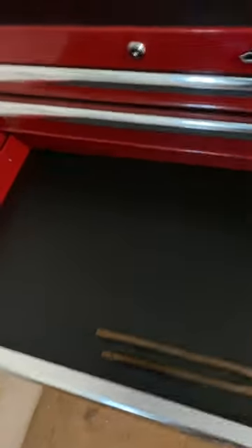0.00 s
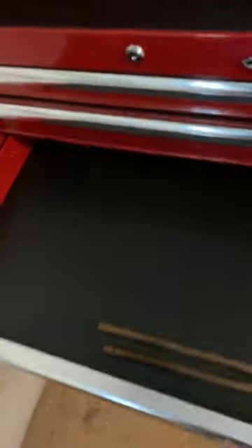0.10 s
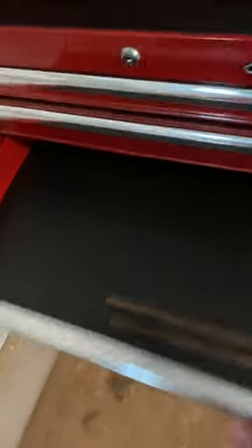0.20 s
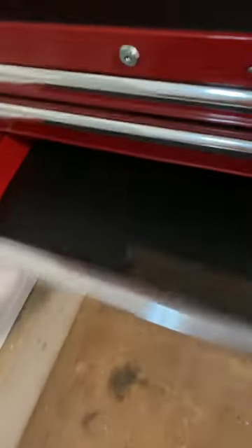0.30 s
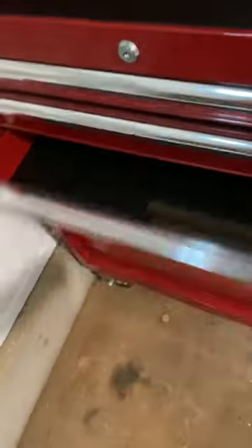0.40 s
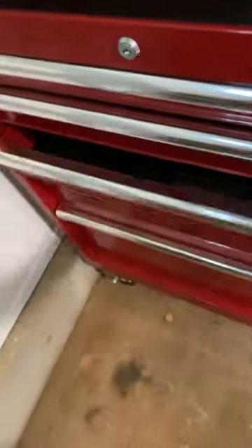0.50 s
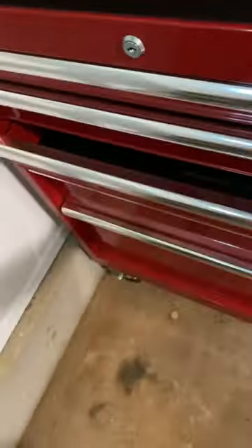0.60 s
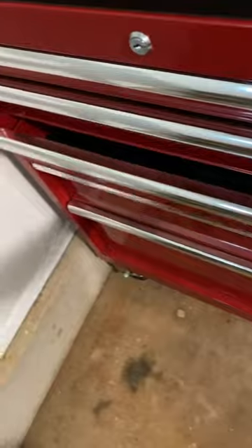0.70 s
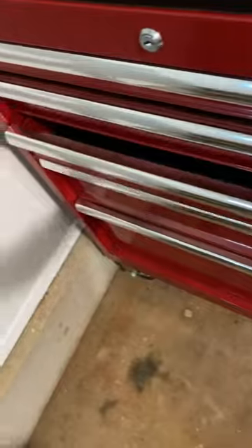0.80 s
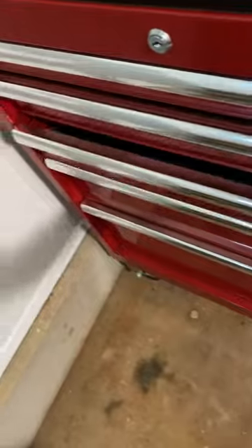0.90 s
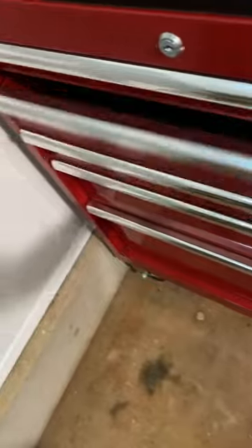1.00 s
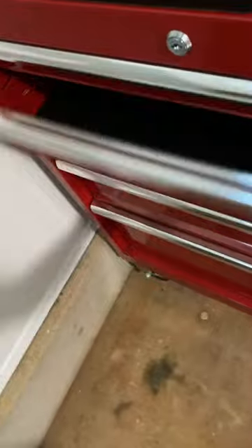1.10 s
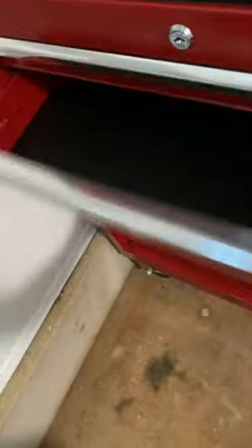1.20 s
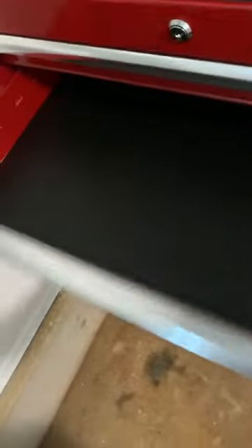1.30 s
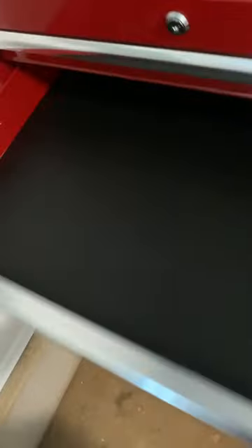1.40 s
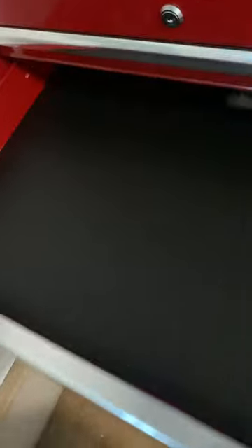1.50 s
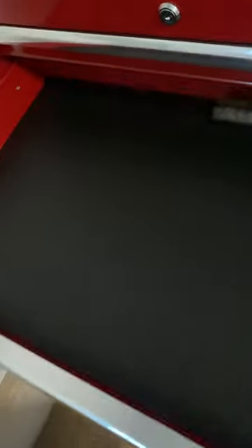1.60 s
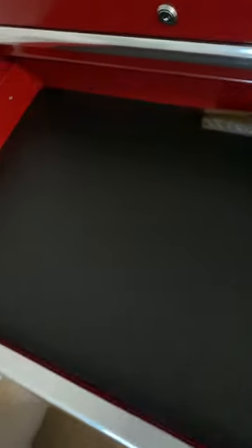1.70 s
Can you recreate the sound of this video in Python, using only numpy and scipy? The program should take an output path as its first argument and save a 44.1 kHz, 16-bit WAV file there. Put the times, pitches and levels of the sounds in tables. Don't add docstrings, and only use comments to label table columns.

```python
import sys
import numpy as np
from scipy import signal
from scipy.fft import rfft, irfft
from scipy.io import wavfile
from scipy.ndimage import uniform_filter1d

SR = 44100
rng = np.random.default_rng(int(sys.argv[2]) if len(sys.argv) > 2 else 0)


def decibels_to_gain(level_db):
    exponent = np.asarray(level_db, float) / 20
    return 10 ** exponent


def log_audio(samples):
    frames = np.atleast_2d(samples).T
    limited = np.clip(frames, -1, 1)
    pcm = np.round(limited * 32767).astype(np.int16)
    wavfile.write(sys.argv[1], SR, pcm)


N = 77175


def rms_one(x):
    return x / np.sqrt(np.mean(x ** 2) + 1e-20)


def colour(x, points):
    hz, db = np.transpose(points)
    bins_hz = np.arange(N // 2 + 1) * SR / N
    gain_db = np.interp(np.log(bins_hz + 1), np.log(hz), db, -90, -90)
    return irfft(rfft(x) * decibels_to_gain(gain_db), N)


def band(x, low_hz, high_hz):
    return signal.sosfilt(signal.butter(2, [low_hz, high_hz], "band", fs=SR, output="sos"), x)


def grains(per_s, spread_db):
    size = decibels_to_gain(spread_db * np.minimum(rng.exponential(1, N), 4))
    size = size * rng.choice([-1, 1], N)
    return rms_one(size * (rng.random(N) < per_s / SR))


def ring(x, hz, t60):
    r = decibels_to_gain(-60 / (max(t60, 0.01) * SR))
    w = 2 * np.pi * hz / SR
    return signal.lfilter([0, np.sin(w)], [1, -2 * r * np.cos(w), r * r], x + 1e-18)


def body(modes, drive_db, per_s):
    bumps = [grains(per_s, 3.5) for _ in modes]
    steady, driven = 0, 0
    for bump, (hz, db, t60) in zip(bumps, modes):
        free = ring(bump, hz, t60)
        steady = steady + decibels_to_gain(db) * rms_one(free)
        driven = driven + decibels_to_gain(db) * ring(bump * decibels_to_gain(drive_db), hz, t60) / np.std(free)
    return driven / np.sqrt(np.mean(steady ** 2))


def cabinet(sway_db):
    # frequency in Hz, level in dB, t60 in seconds.
    carcass_modes = [(74, -7.5, 0.099), (88.7, -5.5, 0.13), (104, -4.5, 0.066), (125.6, 1, 0.098),
                     (153.3, -6, 0.078)]
    boom = body(carcass_modes, 0 * sway_db, 800)
    power = uniform_filter1d(boom ** 2, size=int(0.045 * SR))
    return decibels_to_gain(sway_db) * boom / np.sqrt(power + 0.025)


def rolling():
    # time in seconds, then in dB rolling load, cabinet sway, ball chatter
    motion = [(0.0, -52.5, -43.5, -57, 0), (0.08, -41.5, -47.5, -53.5, -11), (0.174, -40, -51.5, -53.5, -2),
              (0.3, -35.5, -39, -52.5, 0), (0.428, -33, -30.5, -50, -8.5), (0.476, -33.5, -29, -51, 2),
              (0.6, -40, -31, -45.5, 1.5), (0.72, -42, -40.5, -49.5, 0), (0.8, -42, -38.5, -54, -5),
              (0.889, -44, -44, -53.5, -1.5), (0.93, -34, -32.5, -55, -2), (1.0, -39.5, -31.5, -46, 4.5),
              (1.12, -37, -39.5, -48, 1), (1.282, -39.5, -40, -55, 5), (1.428, -38.5, -31, -53.5, 8),
              (1.56, -43.5, -40.5, -59, 6), (1.75, -48, -55, -61.5, 0)]
    # frequency in Hz, level in dB, t60 in seconds.
    panels = [(209, -6.5, 0.06), (281.3, -12, 0.49), (325.9, -1.5, 0.12), (367, -1, 0.11),
              (427, -7.5, 0.24), (518, -0.5, 0.12), (612, 3.5, 0.18), (657.5, 4.5, 0.16),
              (784.4, -5.5, 0.34), (950, -7, 0.072), (1134, -5.5, 0.032), (1246, -12, 0.041),
              (1382, -2, 0.043), (1720, -12, 0.036)]
    # frequency in Hz, density in dB per Hz.
    rumble = [(150, -56), (250, -8.5), (500, -5), (900, -3), (1300, -6.5), (1800, -21), (2500, -23),
              (4000, -34)]
    # frequency in Hz, density in dB per Hz.
    deep_rumble = [(120, -18), (170, -8), (250, -3), (350, -14), (450, -9), (600, -23)]
    # frequency in Hz, density in dB per Hz.
    chatter_spectrum = [(1500, 3), (2500, -0.5), (5000, -1.5), (7200, 0), (8400, -4), (9500, -13.5),
                        (15500, -41)]
    bumps_per_s, deep_below_hz = 900, 500

    s, *columns = np.transpose(motion)
    load, sway, chatter, weight = [np.interp(np.arange(N) / SR, s, c) for c in columns]
    rails = decibels_to_gain(load - 3) * rms_one(colour(grains(3500, 3.0), rumble))
    rails += decibels_to_gain(load + weight - 15.0) * rms_one(colour(grains(1500, 4.6), deep_rumble))
    balls = decibels_to_gain(chatter) * rms_one(colour(grains(8300, -0.5), chatter_spectrum))
    deep_modes = [m for m in panels if m[0] < deep_below_hz]
    high_modes = [m for m in panels if m[0] >= deep_below_hz]
    deep = body(deep_modes, load + weight - 3.0, bumps_per_s)
    high = body(high_modes, load - 2.5, bumps_per_s)
    return deep + high + cabinet(sway - 3.0) + rails + balls


def microphone_hiss():
    return decibels_to_gain(-77.5) * rms_one(band(rng.standard_normal(N), 10000, 20000))


def knocks():
    # start in seconds, peak in dB, pitch in Hz, t60 in seconds.
    blows = [(0.031, -45, 700, 0.64), (0.068, -51, 632, 0.19), (0.292, -37.5, 5800, 0.046),
             (0.36, -36, 2590, 0.02), (.49, -26, 640, 0.1), (0.463, -16, 1183, 0.061),
             (.482, -23, 333, 0.16), (0.462, -18.5, 66, 0.32), (0.468, -20.5, 124.3, 0.41),
             (.46, -21.5, 335, 0.11), (.51, -25, 269, 0.096), (.53, -27.5, 340, .1), (.49, -28, 530, 0.13),
             (0.52, -21, 147, 0.16), (0.72, -30, 121, 0.14), (.464, -25, 1500, 0.055),
             (.910, -26.5, 5060, 0.037), (0.915, -26, 1380, 0.085), (.99, -30, 600, .1),
             (1.062, -26.5, 590, 0.15), (1.1, -30, 530, .1), (.983, -29.5, 1810, 0.073),
             (1.055, -24, 88, 0.3), (1.145, -30.5, 126.3, 0.32), (1.125, -21.5, 78, 0.3),
             (1.175, -29.5, 365, .15), (1.38, -20.5, 397, 0.074), (1.260, -34, 595.7, 0.51),
             (1.373, -26, 606.6, 0.16), (1.372, -23.5, 248, 0.069), (1.425, -26, 400, 0.071),
             (1.638, -43, 4600, .015), (1.640, -43, 2460, 0.027), (0.0012, -39.5, 223, .3),
             (.775, -33.5, 332, 0.16), (1.372, -23, 488, 0.034), (1.41, -31, 196, 0.091),
             (1.55, -29, 370, 0.09)]
    rise_cycles, detune = 1.87, 0.0548
    out = np.zeros(N)
    for s, db, hz, t60 in blows:
        i = int(s * SR)
        t = np.arange(N - i) / SR
        turn = 2 * np.pi * hz * t
        group = np.sin(turn)
        group += 0.34 * np.sin(turn * (1 + detune))
        group += 0.41 * np.sin(turn * (1 - 1.75 * detune))
        out[i:] += decibels_to_gain(db - 0.5 - 60 * t / t60) * (1 - np.exp(-t * hz / rise_cycles)) * group
    return out


def garage(x):
    t = np.arange(SR // 2) / SR
    t60 = 0.4
    tail = rng.standard_normal(len(t)) * decibels_to_gain(-60 * t / t60) * (1 - np.exp(-t / 0.0016))
    walls = signal.butter(1, [180.0, 2100], "band", fs=SR, output="sos")
    tail = signal.sosfilt(walls, tail)
    tail = 3.9 * tail / np.sqrt(np.sum(tail ** 2))
    return decibels_to_gain(-22) * signal.fftconvolve(x, tail)[:N]


def swells(events):
    out = np.zeros(N)
    for s, db, hz, length, glide in events:
        t = np.arange(N) / SR - s
        shape = np.sin(np.pi * np.clip(t / length, 0, 1)) ** 1.46 * (t < length)
        out += decibels_to_gain(db) * shape * np.sin(2 * np.pi * (hz + glide * t / 2) * t)
    return out


def stick_slip():
    # start in seconds, peak in dB, pitch in Hz, length in seconds, glide in Hz per second.
    slips = [(0.198, -25.5, 600.3, 0.034, 500), (0.234, -23, 620, 0.016, -600),
             (0.247, -28, 606, 0.015, -500), (0.378, -27.5, 653, .015, -500),
             (0.462, -11, 629, 0.016, -300), (0.925, -24, 475.5, 0.046, -1000),
             (1.029, -33, 444, 0.035, 200), (1.062, -30, 438.5, 0.037, 0.1), (1.3705, -19, 350, 0.01, 500),
             (1.412, -22.5, 331, 0.011, 500), (1.446, -26.5, 330, 0.011, 500)]
    return swells(slips)


def clacks():
    # start in seconds, level in dB, length in seconds, dull part in dB,
    # bright part in dB.
    contacts = [(0.289, -33.5, .005, -4.5, -11), (.296, -37.5, 0.0074, -6, -14),
                (0.347, -36, 0.0096, -14, -18), (0.394, -38.5, 0.006, 6, -6), (.401, -43.5, 0.0094, 1, -12),
                (0.445, -39.5, 0.025, -3, -3), (0.4534, -19.5, 0.0042, -9.5, -14),
                (0.457, -15.5, 0.0083, -15, -22), (0.4619, -10.5, 0.0036, -4, -35),
                (0.468, -23.5, 0.0043, -0.5, -25), (0.473, -29.5, 0.0054, 1, -20),
                (0.499, -36, .025, -5, -25), (0.53, -42, 0.0098, -6, -30), (0.547, -37, 0.016, -4, -34),
                (0.585, -41, 0.028, -3, -34), (0.651, -46.5, 0.043, -5, -36), (.749, -40, 0.0098, 4.5, -31),
                (0.755, -42, 0.004, 6.5, -27), (0.761, -39, 0.0053, -6, -25), (0.866, -48, 0.014, -20, -4),
                (0.887, -41, 0.02, 2, -28), (0.9096, -22.5, 0.0073, -11.5, -38),
                (0.914, -29, 0.0052, -12, -21), (0.927, -30.5, 0.0054, -7, -18),
                (0.932, -39.5, 0.007, 5, -22), (0.983, -32, 0.0058, -13, -25),
                (1.046, -39.5, 0.012, 7, -24), (1.053, -40, .006, 4, -24), (1.059, -34, 0.0056, -2, -18),
                (1.0615, -27, 0.0048, -5, -18), (1.067, -28, .004, -2.5, -22),
                (1.071, -29, 0.0043, -6.5, -25), (1.074, -28, 0.0041, 0, -22), (1.085, -43, 0.0051, 8, -18),
                (1.098, -39, 0.0066, -4, -20), (1.203, -42.5, 0.0063, 7, -37),
                (1.337, -45.5, 0.013, -12, -27), (1.36, -48, 0.011, 11.5, -24),
                (1.638, -47, 0.0065, -7, -33)]
    # frequency in Hz, density in dB per Hz.
    core_spectrum = [(1100, -44), (2300, -14), (3500, -8), (5000, -9.5), (6200, -8), (7300, -1),
                     (8600, -12), (10000, -21), (15500, -66)]
    ticks = grains(10000, 2.5)
    core = rms_one(colour(ticks, core_spectrum))
    dull = rms_one(band(band(ticks, 560, 2270), 600, 5500))
    bright = rms_one(band(ticks, 7700, 22000))
    out = np.zeros(N)
    for s, db, length, dull_db, bright_db in contacts:
        i = int(s * SR)
        t = np.arange(min(SR // 8, N - i)) / SR
        shape = (1 - np.exp(-t / 0.0006)) * np.exp(-(t / max(length, 0.001)) ** 0.92)
        flurry = core + decibels_to_gain(dull_db) * dull + decibels_to_gain(bright_db) * bright
        out[i:i + len(t)] += decibels_to_gain(db) * shape * flurry[i:i + len(t)]
    return out


def after_rattle(x):
    # frequency in Hz, density in dB per Hz.
    rattle_spectrum = [(700, -16), (1200, 2.5), (2000, -8.5), (4500, -8.5), (7200, -9), (9200, -19),
                       (13000, -33), (15800, -27)]
    t60 = 0.38
    r = decibels_to_gain(-120 / (t60 * SR))
    power = signal.lfilter([0.01], [1, -0.99], x ** 2)
    energy = signal.lfilter([1], [1, -r], power) / (0.0077 * SR)
    rattle = rms_one(colour(rng.standard_normal(N), rattle_spectrum))
    return decibels_to_gain(-16) * np.sqrt(np.maximum(energy, 0)) * rattle


def thuds():
    # start in seconds, level in dB, t60 in seconds.
    stops = [
        (0.465, -24, 0.57),
        (0.931, -34, 0.32),
        (1.371, -30, 0.6),
    ]
    t = np.arange(N) / SR
    lumps = rms_one(band(band(grains(700, 3.8), 153, 756), 153, 756))
    envelope = np.zeros(N)
    for s, db, t60 in stops:
        envelope += decibels_to_gain(db - 60 * np.abs(t - s) / t60) * np.clip((t - s) / 0.0068, 0, 1)
    return lumps * envelope


def heaving():
    # start in seconds, peak in dB, pitch in Hz, length in seconds, glide in Hz per second.
    heaves = [(0.932, -23, 122, .068, 100), (0.995, -24.5, 125, .064, -30), (1.056, -24, 125, .04, -50),
              (1.097, -30, 125, .035, 0)]
    return swells(heaves)


def scene():
    hits = clacks()
    rings = knocks() + stick_slip() + heaving()
    chest = rolling() + hits + rings + thuds() + after_rattle(hits)
    echoes = garage(decibels_to_gain(-5.5) * hits + decibels_to_gain(-7.5) * rings)
    return (chest + echoes + microphone_hiss())[None]


def band_limit(x):
    return signal.sosfilt(signal.butter(12, 16470, fs=SR, output="sos"), x)


def record(dry):
    x = signal.sosfilt(signal.butter(5, 55, "high", fs=SR, output="sos"), dry)
    x = 0.66 * np.tanh(x / 0.65)
    x = signal.sosfilt(signal.cheby2(8, 50, 16400, fs=SR, output="sos"), x)
    return band_limit(x)


dry = scene()
out = record(dry)
log_audio(out)
```